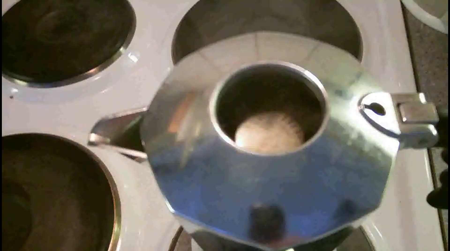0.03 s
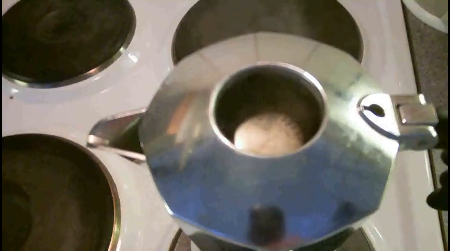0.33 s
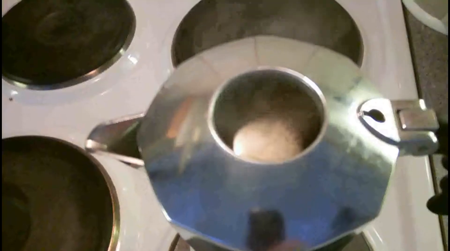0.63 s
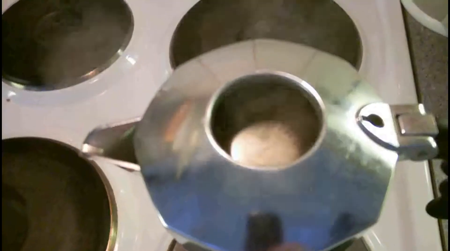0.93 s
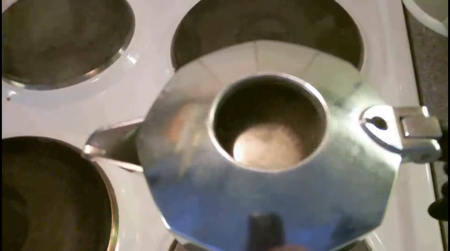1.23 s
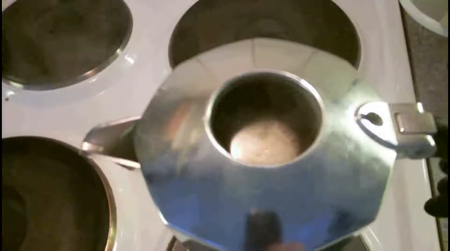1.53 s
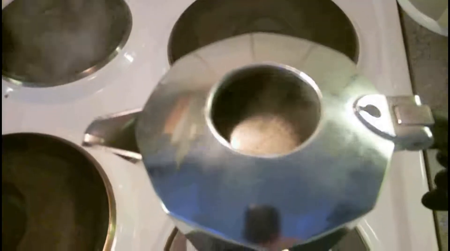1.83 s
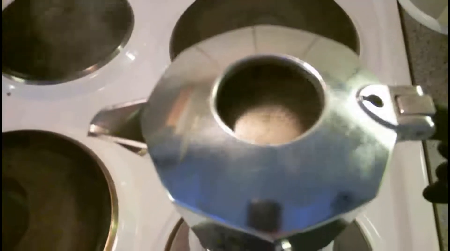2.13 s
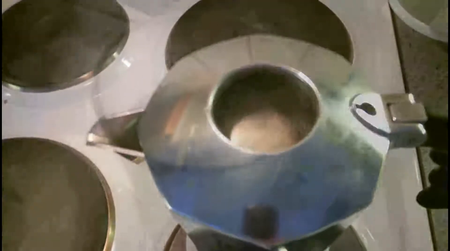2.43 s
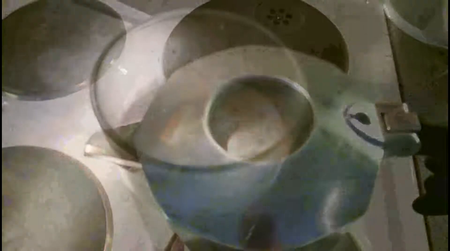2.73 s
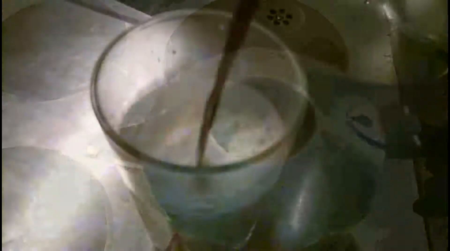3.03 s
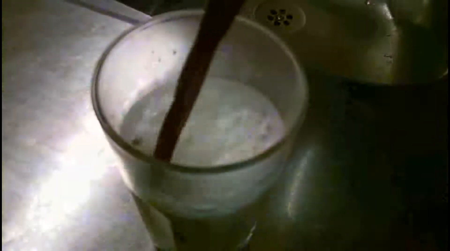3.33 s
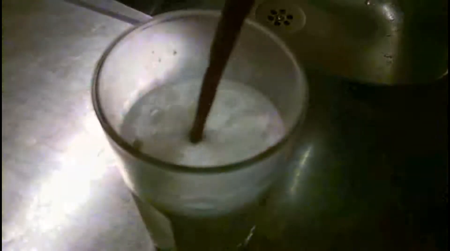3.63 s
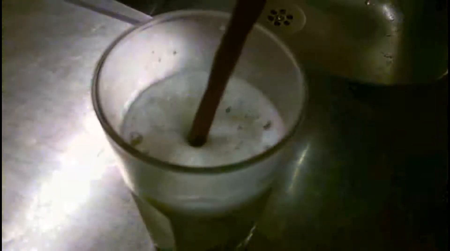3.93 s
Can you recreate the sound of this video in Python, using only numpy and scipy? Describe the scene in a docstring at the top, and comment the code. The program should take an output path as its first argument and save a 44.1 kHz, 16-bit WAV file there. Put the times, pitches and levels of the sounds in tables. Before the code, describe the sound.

Close up in a kitchen, coffee bubbles in a stovetop pot, building to loud, spitting bursts of hissing steam. Then comes a sudden change to a much quieter pour into frothed milk, with faint glass ringing and a low hum.

```python
"""A moka pot finishes brewing on a kitchen stove, heard from just above its lid. Coffee bubbles and
pops in the ringing upper chamber; steam rushes and hisses through the spout in spurts, and the
level dips for moments. Then a hard cut to coffee poured softly into a glass of frothed milk:
the stream splashes, the glass rings and the foam fizzes. A low hum lies under both."""
import sys
import numpy as np
from scipy import signal
from scipy.fft import rfft, irfft, next_fast_len
from scipy.io import wavfile
from scipy.ndimage import uniform_filter1d, minimum_filter1d

SR = 44100
rng = np.random.default_rng(int(sys.argv[2]) if len(sys.argv) > 2 else 0)


def store_wav(level_fs):
    """Save 16-bit WAV to argv[1]."""
    pcm = np.round(np.clip(np.atleast_2d(level_fs), -1, 1) * 32767)
    wavfile.write(sys.argv[1], SR, pcm.T.astype(np.int16))


N = 176400
T = np.arange(N) / SR
POT_START_S, POT_END_S = 0.0425, 3.199

# Fader ride of the hum. Each row: time in seconds, level in dB.
HUM_RIDE = [(0, -64), (2, -66), (2.65, -54), (2.9, -60.5), (4, -60.5)]
# Tone of the room's noise. Each row: frequency in Hz, relative level in dB.
ROOM_EQ = [(20, -22), (50, -15), (100, 0), (200, -1), (1000, -19), (16000, -17)]

# Fader rides of the pour. Each row: time in seconds, then splash, glass ring and foam fizz in dB.
POUR_RIDES = [(3.2, -54, -51, -40), (3.35, -57, -53, -43), (3.5, -55.5, -51.5, -44), (3.65, -56, -53, -44),
              (3.8, -55.5, -53.5, -48.5), (4, -58, -56, -45)]
# Tones of the soft splash and the bright fizz. Each row: frequency in Hz, relative level in dB.
SPLASH_EQ = [(30, -24), (100, -14), (200, -5), (450, 1), (750, -3.5), (1200, 2), (1700, -5), (2200, -10),
             (3000, -12), (6000, -27), (16000, -44)]
FIZZ_EQ = [(30, -40), (2500, -20), (4800, -21), (6000, -8.5), (6750, -6.5), (7350, -1.5), (7850, -6),
           (8300, 0), (8800, -2.5), (10300, -2.5), (11200, -5), (14000, -5), (15500, -1.5)]
# The glass's ring. Each row: first pitch in Hz, last pitch in Hz, nominal width in Hz, relative dB.
GLASS_MODES = [(3510, 3300, 77, -9), (4100, 4000, 200, -7), (4300, 4250, 86, -0.5), (5330, 5100, 190, -7)]
# The glass's upper resonances. Each row: frequency in Hz, width in Hz, gain in dB.
GLASS_SHEEN = [(7060, 70, 3), (7450, 180, 3), (8340, 170, 3), (9250, 110, 3), (10400, 180, 4),
               (11850, 110, 4), (13400, 130, 3)]
# Low resonance fed by the stream: pitch in Hz, nominal width in Hz, level in dB.
STREAM_DRONE = (170.4, 13.5, -59)
# Larger foam bubbles snapping. Each row: start in seconds, level in dB.
FOAM_SNAPS = [(3.524, -37), (3.584, -36), (3.746, -33), (3.903, -38)]

# Steady flow in the pot. Each row: time in seconds, then bubbling, rush and hiss in relative dB.
FLOW_RIDES = [(.05, -25.5, -38.5, -49), (.2, -23, -36, -40.5), (.29, -22.5, -31, -37),
              (.38, -22, -32, -22.5), (.5, -24.5, -30, -22), (.59, -18.5, -36, -22),
              (.615, -16, -16, -17.5), (.72, -20, -21, -19), (.9, -20, -20, -16), (1.1, -22, -19, -17.5),
              (1.3, -20, -17.5, -18.5), (1.46, -19, -20.5, -19), (1.68, -22, -19.5, -16.5),
              (1.85, -20, -20.5, -15), (2.03, -20, -17.5, -18), (2.35, -21.5, -20, -16),
              (2.7, -19, -19, -19), (2.92, -23.5, -20, -18), (3.19, -21.5, -17.5, -15.5)]
# Spurts of steam and coffee. Each row: start in seconds, an unused peak in dB, then bubbling, rush
# and hiss in dB before the trims.
STEAM_SPURTS = [(0.656, -4, -15.5, -20.5, -19), (0.829, 3, -19.5, -21.5, -24), (0.894, 1, -12, -13, -14.5),
                (0.946, 5, -26.5, -10, -4.5), (0.993, -2, -18, -11, -9.5), (1.032, 1, -22, -7.5, -14.5),
                (1.09, 1, -13, -12, -8), (1.144, 0, -17, -12, -9.5), (1.194, 1, -15, -14, -16.5),
                (1.244, 0, -24, -16, -10), (1.329, 0, -20.5, -21, -12.5), (1.362, -2, -18, -11.5, -2.5),
                (1.461, 0, -26, -34.5, -6), (1.486, 1, -19.5, -22, -4), (1.571, 0, -9.5, -14, -3),
                (1.626, -17, -21.5, -11, -30.5), (1.691, 2, -17, -8, -7.5), (1.768, 0, -9, -25.5, -22),
                (1.796, -2, -20.5, -22.5, -6), (1.828, 1, -17, -10, -10), (1.902, 0, -13.5, -14.5, -21),
                (1.956, 0, -27.5, -10, -6.5), (2.037, 0, -14.5, -12, -14), (2.086, 0, -32.5, -18, -5.5),
                (2.121, -1, -33, -6.5, -17), (2.166, 0, -10.5, -10.5, -11.5), (2.206, 0, -30, -20, -12.5),
                (2.246, 1, -9, -9, -12.5), (2.292, 0, -13.5, -12.5, -9.5), (2.365, 0, -18.5, -11.5, -11),
                (2.422, 1, -22.5, -15.5, -12.5), (2.464, 0, -27, -11.5, -15.5), (2.54, 0, -9, -14, -11.5),
                (2.579, 1, -25, -9.5, -7.5), (2.66, 2, -11.5, -26, -7), (2.703, -1, -15, -14, -6.5),
                (2.765, 0, -16, -12.5, -19), (2.792, 2, -18, -11, -6), (2.83, 2, -12.5, -28, -5.5),
                (2.884, 0, -11.5, -19, -6.5), (2.973, -1, -13, -9.5, -11), (3.017, 0, -7, -20, -9),
                (3.114, -3, -13, -33, -9), (3.16, 0, -16, -8, -9.5)]
# Trims on every spurt: bubbling, rush and hiss in dB.
SPURT_TRIMS = [-4.5, -3, -6]
# Brief dips in the pot's level; the two deepest follow loud spurts.
# Each row: centre in seconds, length in seconds, depth in dB.
LEVEL_DIPS = [(0.783, .013, 9.5), (0.857, 0.017, 5.5), (0.978, 0.02, 12), (1.054, 0.012, 3),
              (1.113, 0.013, 7.5), (1.166, 0.014, 6.5), (1.382, 0.023, 7), (1.504, 0.014, 10.5),
              (1.621, .014, 4.5), (1.72, 0.0062, 10), (1.75, 0.027, 2.5), (1.817, 0.011, 9.5),
              (1.872, 0.016, 6), (2.108, 0.03, 6), (2.238, 0.03, 2), (2.283, .01, 1), (2.392, 0.011, 5.5),
              (2.44, 0.009, 7), (2.531, 0.011, 9.5), (2.602, 0.01, 4), (2.747, 0.0099, 3),
              (2.818, 0.012, 4.5), (3.04, 0.019, 4.5), (3.175, 0.0056, 7)]
# Fader ride of the first steam's sizzle. Each row: time in seconds, level in dB.
SIZZLE_RIDE = [(.05, -42), (.15, -38), (.29, -34), (.32, -27), (.42, -32), (.54, -29), (.64, -22),
               (.74, -34), (.9, -28), (1.3, -40), (3.2, -40)]
# Tones of the pot's four noisy layers. Each row: frequency in Hz, relative level in dB.
BUBBLING_EQ = [(30, -76), (100, -37), (250, -12), (400, -8.5), (560, -13.5), (680, -2), (1000, -2.5),
               (1400, -3.5), (2000, -5), (2700, -4), (4500, -15), (5600, -36), (16000, -61)]
RUSH_EQ = [(30, -53), (500, -22.5), (1500, -21.5), (2600, -9.5), (3300, -6), (4000, 0.5), (4500, -0.5),
           (5200, -8.5), (6200, -8.5), (8000, -17), (16000, -25.5)]
HISS_EQ = [(30, -50), (2000, -37.5), (5200, -12.5), (6400, -5.5), (7300, 2.5), (8500, -1), (9900, -6),
           (11500, -1), (13000, -7.5), (15500, -12)]
SIZZLE_EQ = [(30, -58), (5000, -33), (7800, -12), (9200, 1), (11000, 1), (12000, -7), (13500, 0),
             (15500, -9.5)]
# Ringing of the spout. Each row: frequency in Hz, width in Hz, gain in dB.
SPOUT_MODES = [(3830, 470, 2), (4280, 150, -1)]
# The air above the coffee, mostly rising as the pot fills. Each row: time in seconds, pitch in Hz.
CAVITY_PITCH = [(0, 810), (.8, 804), (1.3, 920), (2.2, 1040), (2.7, 1110), (3.2, 1010)]
# Large bubbles bursting. Each row: start in seconds, relative level in dB, pitch in Hz.
BUBBLE_POPS = [(0.0667, -6, 1320), (0.0867, -9, 1330), (0.1429, -7, 1230), (.2465, -6, 1250),
               (0.2864, -5.5, 1440), (.351, -10, 1100), (0.362, -7, 1200), (.478, -4, 1440),
               (0.552, -5.5, 1680), (.588, -4, 1010), (0.722, -2.5, 1030), (.771, -2.5, 990),
               (.808, -1, 910), (.837, -1.5, 1100), (.903, -8, 1100), (1.042, -3, 1060), (1.184, -4, 950),
               (1.265, -2, 1080), (1.444, -1, 1040), (1.801, 0.5, 1150), (2.031, -8, 980), (2.357, 0, 1150),
               (2.473, -5.5, 1110), (2.65, -8.5, 1320), (2.768, -11, 1140), (2.887, -15, 900)]
# Steam gurgles. Each row: centre in seconds, length in seconds, pitch in Hz, level in dB.
STEAM_GURGLES = [(0.28, 0.053, 2750, -26), (0.833, 0.013, 2500, -25), (1.282, 0.06, 1110, -22.5),
                 (1.368, 0.014, 1450, -20), (1.455, 0.016, 2570, -22), (1.635, 0.021, 5760, -20),
                 (1.643, .025, 3900, -15.5), (2.549, 0.02, 2660, -16), (2.587, 0.018, 3500, -24),
                 (2.657, 0.018, 1550, -28), (2.652, 0.018, 2580, -22.5), (2.707, 0.015, 1850, -20)]
# Resonances of the chamber. Each row: frequency in Hz, width in Hz, gain in dB.
CHAMBER_MODES = [(452, 20, 6), (689.6, 25, 3.5), (804, 28, 0), (960, 32, 3.5), (1163, 49, 2), (1513, 17, 6),
                 (1560, 20, 0.5), (1822, 82, 8), (2223, 84, 3.5), (2688, 165, 4), (3160, 130, 2),
                 (4190, 43, 0.5), (4450, 73, 1.5), (5500, 48, -7), (6800, 40, 2)]
# Tone of the full chamber. Each row: frequency in Hz, width in Hz, gain in dB when full.
FULL_CHAMBER_EQ = [(560, 300, -5), (1250, 400, 1.5), (3770, 600, -6), (7030, 500, -4), (8600, 420, 1.5),
                   (13200, 1100, 4.5)]
# The microphone's narrow null. Each row: frequency in Hz, width in Hz, gain in dB.
MIC_NOTCH = [(7845, 130, -16)]


def from_db(db):
    """Decibels to gain."""
    return 10 ** (np.asarray(db) / 20)


def rms_one(x):
    """Scale to unit rms."""
    return x / np.sqrt(np.mean(x ** 2) + 1e-20)


def faders(rows):
    """One gain curve for each dB column."""
    times, *columns = np.transpose(rows)
    return [from_db(np.interp(T, times, db)) for db in columns]


def drift(hz):
    """Smooth random modulation, mostly slower than hz; unit rms."""
    r = np.exp(-2 * np.pi * hz / SR)
    return rms_one(signal.lfilter([1], [1, -2 * r, r * r], rng.standard_normal(N + SR))[SR:])


def grains(per_s=5000, spread_db=4.5):
    """Random clicks, many small and a few large; unit rms."""
    sizes = from_db(spread_db * np.minimum(rng.exponential(1, N), 4)) * rng.choice([-1, 1], N)
    return rms_one(sizes * (rng.random(N) < per_s / SR))


def equalise(x, eq):
    """Minimum-phase filter following an EQ curve; unit rms."""
    size = next_fast_len(N + SR)
    hz, db = np.transpose(eq)
    bins_hz = np.maximum(np.fft.rfftfreq(size, 1 / SR), 1)
    gain = from_db(np.interp(np.log(bins_hz), np.log(hz), db))
    cepstrum = irfft(np.log(gain), size)
    cepstrum[1:size // 2] *= 2
    cepstrum[size // 2 + 1:] = 0
    return rms_one(irfft(rfft(x, size) * np.exp(rfft(cepstrum)), size)[:N])


def resonator(hz, width_hz):
    """Band-pass coefficients with unity gain at the peak."""
    r = np.exp(-np.pi * width_hz / SR)
    return np.array([1, 0, -1]) * (1 - r * r) / 2, [1, -2 * r * np.cos(2 * np.pi * hz / SR), r * r]


def resonate(x, hz, width_hz):
    """Ring one steady resonance."""
    return signal.lfilter(*resonator(hz, width_hz), x + 1e-18)


def steep_band(x, hz, width_hz):
    """Two double-width resonances in series, for steeper skirts; unit rms."""
    return rms_one(resonate(resonate(x, hz, 2 * width_hz), hz, 2 * width_hz))


def glide(x, path, width_hz, block=512):
    """A resonance swept along points of time in seconds and pitch in Hz."""
    out, state = np.zeros(N), np.zeros(2)
    centre_hz = np.interp(T, *np.transpose(path))
    for i in range(0, N, block):
        b, a = resonator(centre_hz[i], width_hz)
        out[i:i + block], state = signal.lfilter(b, a, x[i:i + block], zi=state)
    return out


def through(x, bands):
    """A chain of peaks and dips; each gain may be a number or a curve."""
    for hz, width_hz, db in bands:
        x = x + (from_db(db) - 1) * resonate(x, hz, width_hz)
    return x


def jet(eq, flutter_db, spatter_db):
    """Fluttering turbulence with droplets torn off in it."""
    spray = rng.standard_normal(N) + from_db(spatter_db) * grains()
    return equalise(spray * from_db(flutter_db), eq)


def kitchen(hum_hz=151, room_db=-58.5):
    """The bed: a wavering hum over faint room tone."""
    level, = faders(HUM_RIDE)
    phase = 2 * np.pi * np.cumsum(hum_hz + 1.5 * drift(3.5)) / SR
    hum = np.sqrt(2) * np.sin(phase) * level * from_db(2 * drift(1.3))
    return hum + from_db(room_db) * equalise(rng.standard_normal(N), ROOM_EQ)


def foam_ticks(decay_s=.0003):
    """Larger foam bubbles snap in tiny, bright ticks."""
    envelope = sum(from_db(db) * np.exp(-np.abs(T - s) / decay_s) * (T >= s) for s, db in FOAM_SNAPS)
    return envelope * equalise(rng.standard_normal(N), FIZZ_EQ)


def glass_ring(waver_db=1.5):
    """The stream's patter rings the glass, whose pitches sink as it fills."""
    patter = rng.standard_normal(N) + grains(per_s=3000, spread_db=2.7)
    ring = 0
    for first_hz, last_hz, width_hz, db in GLASS_MODES:
        path = [(POT_END_S, first_hz), (T[-1], last_hz)]
        mode = glide(glide(patter, path, 2 * width_hz), path, 2 * width_hz)
        ring = ring + from_db(db + waver_db * drift(14)) * mode
    return rms_one(ring)


def pour():
    """A smooth stream sinks into foam: soft splash, ringing glass, fading fizz and a low drone."""
    splash_level, ring_level, fizz_level = faders(POUR_RIDES)
    ring = glass_ring()
    hz, width_hz, db = STREAM_DRONE
    drone = from_db(db) * steep_band(rng.standard_normal(N), hz, width_hz)
    splash = jet(SPLASH_EQ, .8 * drift(25), spatter_db=-7)
    fizz = rms_one(through(jet(FIZZ_EQ, .5 * drift(40), spatter_db=-8), GLASS_SHEEN))
    return splash_level * splash + ring_level * ring + fizz_level * fizz + drone


def reflections(x, wet_db=-9.5, t60_s=.09):
    """A short, dense tail off the stove top and nearby walls."""
    t = T[:SR // 3]
    tail = rng.standard_normal(len(t)) * np.exp(-np.log(1000) * t / t60_s) * (t > .002)
    return from_db(wet_db) * signal.fftconvolve(x, tail / np.linalg.norm(tail))[:N]


def chamber(x, fill_from_s=1.74, full_at_s=2.86):
    """The chamber rings; rising coffee takes away its hollow low tone and brightens the very top."""
    fullness = np.clip((T - fill_from_s) / (full_at_s - fill_from_s), 0, 1)
    filling = [(hz, width_hz, db * fullness) for hz, width_hz, db in FULL_CHAMBER_EQ]
    return through(through(x, CHAMBER_MODES), filling)


def sizzle():
    """The first steam sizzles finely through the wet spout."""
    level, = faders(SIZZLE_RIDE)
    return level * jet(SIZZLE_EQ, 1.5 * drift(80), spatter_db=-2)


def gurgles(q=6.4):
    """Steam pushes through pockets of coffee, each a brief run of bubbles on one pitch."""
    froth = grains()
    out = np.zeros(N)
    for centre_s, length_s, hz, db in STEAM_GURGLES:
        swell = np.exp(-2 * ((T - centre_s) / length_s) ** 2)
        out += from_db(db) * swell * steep_band(froth, hz, hz / q)
    return out


def pops(trim_db=-2.5, t60_cycles=11.4, snap_db=-2, snap_s=.0016):
    """Each large bubble opens with a snap and a heavily damped ring."""
    out, t = np.zeros(N + SR), T[:SR // 20]
    for start_s, db, hz in BUBBLE_POPS:
        ring = np.sin(2 * np.pi * hz * t) * np.exp(-np.log(1000) * t * hz / t60_cycles)
        snap = from_db(snap_db) * rng.standard_normal(len(t)) * np.exp(-t / snap_s)
        i = int(start_s * SR)
        out[i:i + len(t)] += from_db(db + trim_db) * (ring + snap)
    return signal.sosfilt(signal.butter(2, [420, 4500], "band", fs=SR, output="sos"), out[:N])


def flow_levels(crest_after_s=.013, swell_s=.015, fall_s=.0045):
    """Steady flow plus spurts that swell and collapse, with brief dips in the level of both."""
    power = np.array(faders(FLOW_RIDES)) ** 2
    for start_s, _, *layer_db in STEAM_SPURTS:
        t = T - start_s - crest_after_s
        surge = np.exp(-(t / np.where(t < 0, swell_s, fall_s)) ** 2)
        power += from_db(np.array(layer_db) + SPURT_TRIMS)[:, None] ** 2 * surge
    dip_db = sum(db * np.exp(-(2 * (T - s) / length_s) ** 2) for s, length_s, db in LEVEL_DIPS)
    return np.sqrt(power) * from_db(-dip_db)


def spitting(per_s=70, collapse_s=.00061):
    """Pressure climbs and suddenly drops at uneven intervals; unit rms."""
    collapses = np.cumsum(rng.gamma(3, 1 / (3 * per_s), 2000)) - 1
    sawtooth = np.interp(T, collapses, np.arange(len(collapses))) % 1 - .5
    r = np.exp(-1 / (collapse_s * SR))
    return rms_one(signal.lfilter([1 - r], [1, -r], sawtooth))


def bubbling(ring_cycles=5.05, froth_db=-4, flutter_db=2, cavity_db=4.5):
    """Small bubbles ring briefly over a froth of tiny bursts; the air above the coffee resonates."""
    clicks = grains(per_s=2200, spread_db=2)
    pitches = np.geomspace(500, 3500, 20)
    pitch_index = rng.integers(0, len(pitches), N)
    rings = sum(resonate(clicks * (pitch_index == k), hz, 2 * hz / ring_cycles) / np.sqrt(hz)
                for k, hz in enumerate(pitches))
    bursts = rms_one(rings) + from_db(froth_db) * grains()
    boil = equalise(bursts * from_db(flutter_db * drift(70)), BUBBLING_EQ)
    return rms_one(boil + (from_db(cavity_db) - 1) * glide(boil, CAVITY_PITCH, width_hz=390))


def spout_rush(pressure):
    """A wet jet pulses with the pressure and rings the spout."""
    rush = jet(RUSH_EQ, 1.5 * pressure + 1.76 * drift(79), spatter_db=0)
    return rms_one(through(rush, SPOUT_MODES))


def steam_hiss(pressure, film_db=2, film_rate_hz=22.2, film_width_hz=1230):
    """Steam hisses with the pressure; liquid in the spout makes broad peaks come and go."""
    hiss = jet(HISS_EQ, 2 * pressure + .87 * drift(150), spatter_db=-4)
    film = [(hz, film_width_hz, film_db * drift(film_rate_hz)) for hz in np.geomspace(5800, 14000, 8)]
    return rms_one(through(hiss, film))


def moka_pot(bubbling_db=-2, rush_db=-1, hiss_db=.5):
    """Bubbling, rush and hiss spit together and sound through the chamber with the smaller layers."""
    bubbling_level, rush_level, hiss_level = flow_levels()
    pressure = spitting()
    coffee = from_db(bubbling_db + pressure) * bubbling_level * bubbling()
    rush = from_db(rush_db) * rush_level * spout_rush(pressure)
    hiss = from_db(hiss_db) * hiss_level * steam_hiss(pressure)
    pot = chamber(coffee + rush + hiss + sizzle() + pops() + gurgles())
    return pot + reflections(pot)


def scene(fade_in_s=.0086, crossfade_s=.003):
    """The pot, then a hard cut to the pour, over the kitchen bed; mono."""
    fade_in = np.clip((T - POT_START_S) / fade_in_s, 0, 1)
    to_pour = np.clip((T - POT_END_S) / crossfade_s + 1, 0, 1)
    mix = moka_pot() * (1 - to_pour) + (pour() + foam_ticks()) * to_pour + kitchen()
    return (fade_in * mix)[None]


def record(dry, threshold=.91, attack_s=.00078, release_db_per_s=183, cutoff_hz=15700):
    """The microphone colours the sound, a fast limiter holds the peaks down, and the top is cut."""
    notched = through(dry, MIC_NOTCH)
    over_db = 20 * np.log10(np.maximum(np.abs(notched[0]) / threshold, 1))
    release_db = release_db_per_s * T
    held_db = np.maximum.accumulate(over_db + release_db) - release_db
    window = int(attack_s * SR)
    gain = from_db(uniform_filter1d(minimum_filter1d(-held_db, window), window))
    high_cut = signal.ellip(12, .05, 60, cutoff_hz, fs=SR, output="sos")
    return signal.sosfiltfilt(high_cut, notched * gain)


dry = scene()
out = record(dry)
store_wav(out)
```